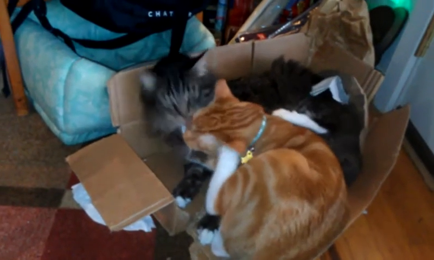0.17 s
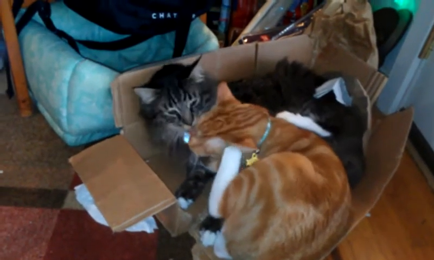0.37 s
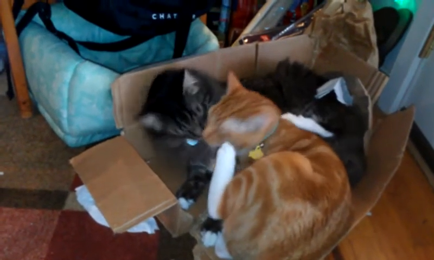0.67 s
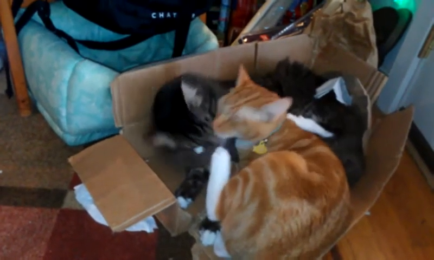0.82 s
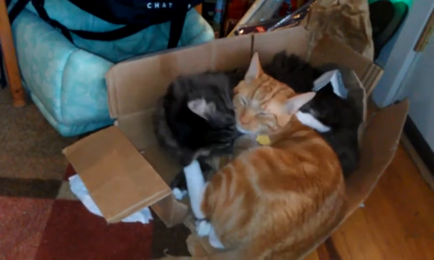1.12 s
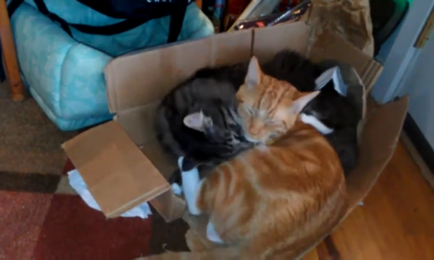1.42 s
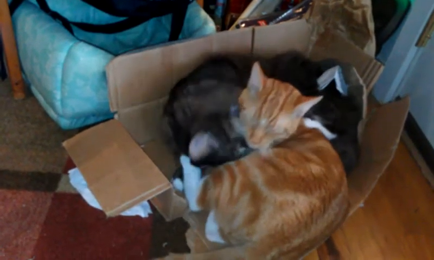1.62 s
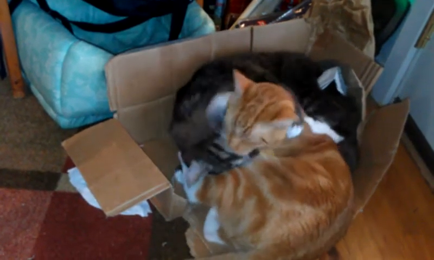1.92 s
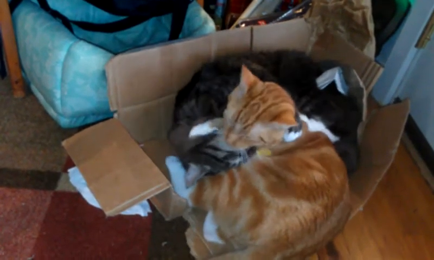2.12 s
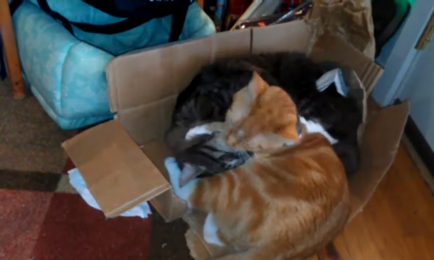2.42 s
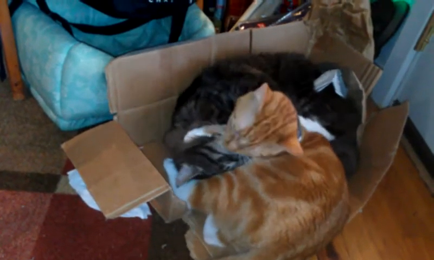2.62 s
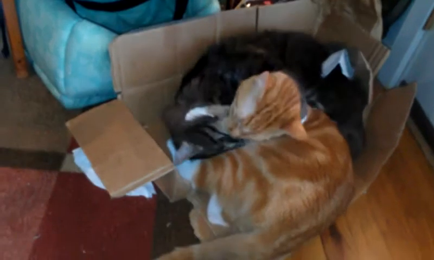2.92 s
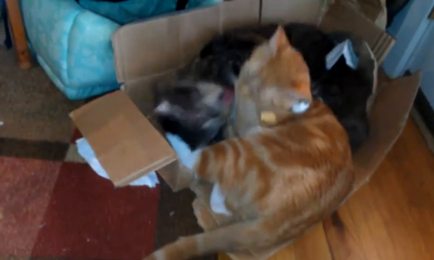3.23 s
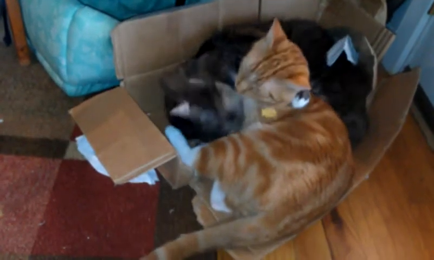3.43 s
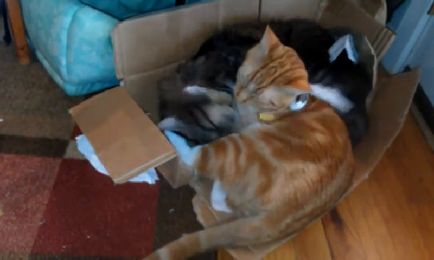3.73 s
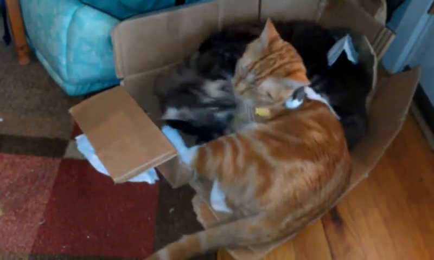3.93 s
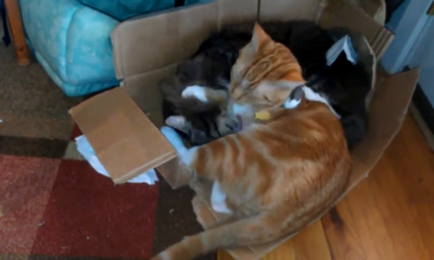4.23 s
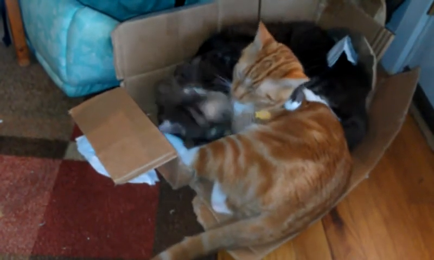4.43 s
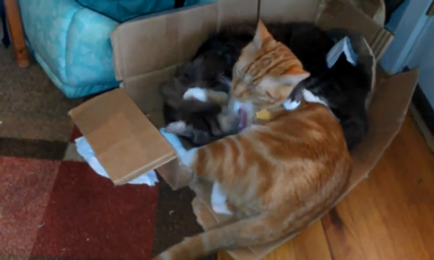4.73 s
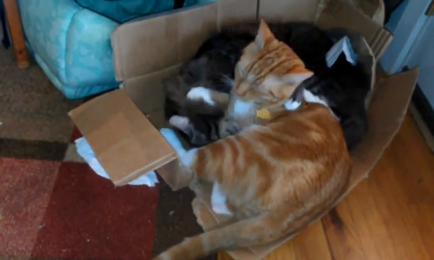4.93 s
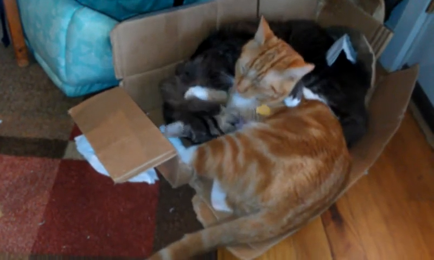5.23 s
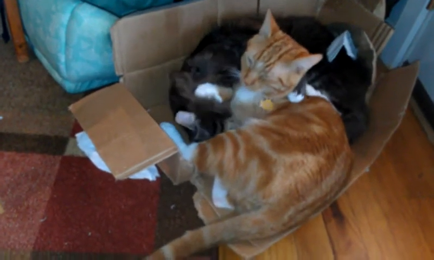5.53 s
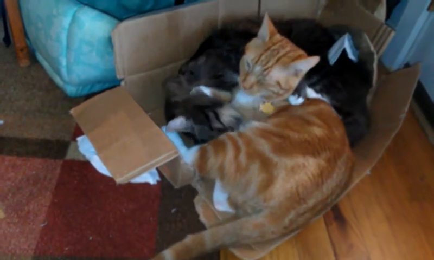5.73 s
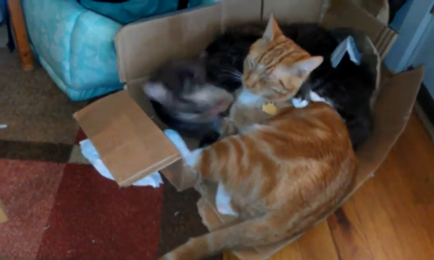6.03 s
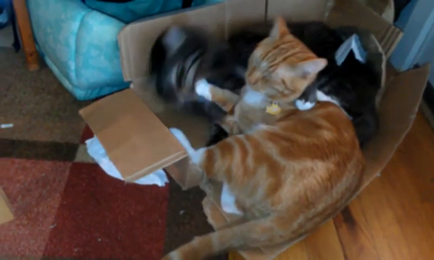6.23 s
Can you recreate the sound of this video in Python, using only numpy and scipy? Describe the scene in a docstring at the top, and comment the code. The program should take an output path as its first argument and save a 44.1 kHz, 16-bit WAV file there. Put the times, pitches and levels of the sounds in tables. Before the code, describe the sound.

Cats groom each other in a cardboard box in a quiet room. A tongue smacks, then fur drags and snags on the cardboard in short, scratchy scuffs, with a faint collar tag tinkle and a brief crisp rustle. Sparse licks and mouth clicks follow before a last bout of scuffing. An appliance hums steadily underneath, and the small, close microphone makes everything sound thin.

```python
"""Two cats groom each other in a cardboard box in a quiet room; an appliance hums throughout.
A tongue smacks, then fur drags and snags on the cardboard as they shift. Near 2 s a collar tag tinkles,
and near 2.8 s comes a crisp rustle, close by. Sparse mouth clicks, tongue smacks and light strokes
follow, until a last bout of scuffing at 6 s. The small microphone rings near 3 kHz, which gives
the scuffs and clicks the same thin colour."""
import sys
import numpy as np
from scipy import signal
from scipy.fft import rfft, irfft
from scipy.io import wavfile

SR = 44100
rng = np.random.default_rng(int(sys.argv[2]) if len(sys.argv) > 2 else 0)


def master_out(mix):
    """Clip the mix to full scale and print it as 16-bit PCM to the path in sys.argv[1]."""
    frames = np.transpose(np.atleast_2d(mix))
    ceiling = np.clip(frames, -1, 1)
    pcm = np.round(ceiling * 32767).astype(np.int16)
    wavfile.write(sys.argv[1], SR, pcm)


N = 280476
TIME = np.arange(N) / SR

# friction as the small microphone colours it: frequency_hz, relative_db
MIC_COLOUR = [(100, -59), (300, -30), (750, -23.5), (1250, -26), (1700, -17), (2200, -12), (2650, -2.5),
              (3080, 3), (3600, -6.5), (4400, -22), (5400, -31), (8300, -54), (11000, -66), (14500, -34)]
# the hardest snags of fur on the cardboard: start_s, level_db
FUR_SNAGS = [(1.209, -22.5), (1.28, -18), (1.2997, -16), (1.38, -16.5), (1.4798, -11), (1.515, -10),
             (1.7795, -13), (1.8354, -16), (2.048, -11), (6.1759, -13), (6.2943, -13.5), (6.325, -8)]


def amp(db):
    """Decibels to gain."""
    return 10 ** (np.asarray(db) / 20)


def unit_rms(x):
    """Scales to rms 1."""
    return x / np.sqrt(np.mean(x ** 2) + 1e-20)


def unit_peak(x):
    """Scales to peak 1."""
    return x / abs(x).max()


def add(mix, start_s, sound):
    """Mixes a sound in at start_s."""
    part = mix[max(round(start_s * SR), 0):][:len(sound)]
    part += sound[:len(part)]


def colour(x, spectrum, size=4096):
    """Minimum-phase filter of energy 1, shaped like the given spectrum."""
    hz, db = np.transpose(spectrum)
    bins_hz = abs(np.fft.fftfreq(size, 1 / SR))
    log_gain = np.log(amp(np.interp(np.log(bins_hz + 1), np.log(hz), db)))
    response = np.exp(np.conj(signal.hilbert(log_gain)))
    taps = np.fft.ifft(response).real[:size // 2]
    return signal.oaconvolve(x, taps / np.linalg.norm(taps))[:len(x)]


def drift(rate_hz):
    """Smooth random motion of rms 1, mostly slower than rate_hz."""
    lowpass = np.exp(-(np.fft.rfftfreq(N, 1 / SR) / rate_hz) ** 2)
    return unit_rms(irfft(rfft(rng.standard_normal(N)) * lowpass, N))


def ring(hz, decay_s):
    """A damped sine, a tenth of a second long."""
    t = np.arange(SR // 10) / SR
    return np.exp(-t / decay_s) * np.sin(2 * np.pi * hz * t)


def room_tone(level_db=-46, swell_db=0.37):
    """The air of the quiet room and the microphone's own hiss, almost steady."""
    # air and hiss: frequency_hz, relative_db
    spectrum = [(65, -39.5), (175, -20.5), (235, -4), (275, -7), (370, -5), (750, -10.5), (1500, -12.5),
                (2200, -8.5), (3100, 1), (4200, -19.5), (6500, -22), (8000, -29.5), (9500, -23),
                (15000, -20)]
    air = unit_rms(colour(rng.standard_normal(N), spectrum))
    return air * amp(level_db + swell_db * drift(3.5))


def appliance_hum(waver_db=1.2, wander_hz=0.54):
    """An appliance hums in the room; each partial wavers a little in level and pitch."""
    # partials of the hum: pitch_hz, rms_db
    partials = [(119, -82.5), (315.8, -53), (947, -67.5), (1263, -74.5)]
    out = np.zeros(N)
    for hz, db in partials:
        level = np.sqrt(2) * amp(db + waver_db * drift(6.4))
        pitch_hz = hz + wander_hz * drift(3.56)
        out += level * np.sin(2 * np.pi * np.cumsum(pitch_hz) / SR)
    return out


def echoes(x, wall_db=-14, wall_s=0.0032, far_db=-17, far_s=0.014, tail_db=-10, t60_s=0.12):
    """The box wall and a farther surface reflect once; the furnished room adds a short tail."""
    t = np.arange(SR // 3) / SR
    tail = rng.standard_normal(len(t)) * amp(-60 * t / t60_s) * (t > wall_s)
    taps = amp(tail_db) * tail / np.linalg.norm(tail)
    add(taps, wall_s, amp([wall_db]))
    add(taps, far_s, amp([far_db]))
    return signal.oaconvolve(x, taps)[:N]


def box_bumps(low_cut_hz=170):
    """Padded knocks: the cardboard swells into a few cycles and stops."""
    # knocks against the box: start_s, level_db, pitch_hz, decay_s
    knocks = [(1.326, -36.5, 796, 0.0018), (1.956, -40.5, 780, .002), (2.061, -32.5, 500, 0.0016),
              (2.072, -36, 806, 0.0026), (2.768, -34.5, 326, 0.00073)]
    out, t = np.zeros(N), np.arange(SR // 10) / SR
    for start_s, db, hz, decay_s in knocks:
        swell = np.e * t / decay_s
        add(out, start_s, amp(db) * swell * ring(hz, decay_s))
    return signal.sosfilt(signal.butter(3, low_cut_hz, "highpass", fs=SR, output="sos"), out)


def collar_tag():
    """Each tap sets the metal tag's high modes tinkling faintly."""
    # taps on the tag: start_s, level_db
    taps = [(1.875, -34.5), (1.893, -43), (1.908, -52), (1.931, -45), (6.205, -44)]
    # modes of the metal: pitch_hz, relative_db, t60_s
    modes = [(6030, -13, .03), (6900, -9, 0.045), (10470, 0.5, 0.021), (14200, -7, .02)]
    tinkle = sum(amp(db) * ring(hz, t60_s / np.log(1000)) for hz, db, t60_s in modes)
    out = np.zeros(N)
    for start_s, db in taps:
        add(out, start_s, amp(db) * tinkle)
    return out


def close_rustles():
    """Bright crackles close to the microphone swell and die in milliseconds."""
    # rustles and ticks: start_s, level_db, rise_s, decay_s
    bursts = [(1.871, -42.5, 0.026, .025), (1.93, -46, 0.00085, .012), (1.946, -41.5, .001, 0.0083),
              (2.706, -40, .001, .002), (2.7492, -33.5, 0.00029, 0.00074), (2.783, -37, .001, 0.005),
              (2.801, -27, 0.0044, 0.0091), (2.8104, -27.5, 0.00091, 0.004)]
    # their crisp colour: frequency_hz, relative_db
    spectrum = [(200, -30), (1800, -15), (3200, 8), (4500, -10.5), (6000, 0), (8500, -13.5), (11000, -13),
                (14000, -3.5), (16000, -17)]
    out, t = np.zeros(N), np.arange(SR // 10) / SR
    for start_s, db, rise_s, decay_s in bursts:
        envelope = np.minimum(t / rise_s, 1) * np.exp(-np.maximum(t - rise_s, 0) / decay_s)
        add(out, start_s, amp(db) * envelope * rng.standard_normal(len(t)))
    return colour(out, spectrum)


def mouth_ticks(ticks_per_s=5, tick_db=-35, spread_db=2, mouth_hz=3000, decay_s=0.00047):
    """The wet mouths tick faintly at random."""
    tick = unit_peak(colour(ring(mouth_hz, decay_s), MIC_COLOUR))
    sizes = amp(tick_db + spread_db * rng.uniform(-1, 1, N))
    onsets = rng.random(N) < ticks_per_s / SR
    return signal.oaconvolve(sizes * onsets, tick)[:N]


def tongue_noises():
    """Short narrow-band noises: tongue rasps, squeaks, and the bright snap of three tongue smacks."""
    # rasps, squeaks and snaps of smacks: start_s, level_db, length_s, centre_hz, width_hz
    bursts = [(0.193, -37, 0.0047, 4250, 550), (0.427, -46.5, 0.16, 4300, 450),
              (0.49, -37, 0.051, 3640, 70), (1.422, -38, 0.02, 4500, 800), (1.978, -37, 0.055, 4460, 815),
              (2.558, -33, .014, 2660, 400), (3.103, -35, 0.0067, 3690, 250),
              (4.551, -37.5, 0.0076, 4530, 450)]
    out = np.zeros(N)
    for start_s, db, length_s, hz, width_hz in bursts:
        band = signal.butter(2, [hz - width_hz / 2, hz + width_hz / 2], "bandpass", fs=SR, output="sos")
        noise = unit_rms(signal.sosfilt(band, rng.standard_normal(SR // 4)))
        burst = noise[-round(length_s * SR):]
        add(out, start_s, amp(db) * burst * np.hanning(len(burst)))
    return out


def tongue_smacks(gain_db=-1, mouth_decay_s=0.00031, pop_db=-9, pop_hz=2150):
    """The tongue lets go: the mouth rings for a few cycles over a short, lower pop."""
    # clear smacks: start_s, level_db, mouth_hz
    smacks = [(0.195, -20, 3230), (1.076, -22.5, 2730), (1.1193, -27, 3000), (1.433, -15, 3600),
              (1.449, -18, 3100), (2.4605, -18.5, 3370), (3.106, -23, 3130), (3.169, -22, 3400),
              (3.4115, -25.5, 2710), (3.5094, -22.5, 3130), (3.52, -22.5, 2980), (3.899, -18, 3020),
              (4.219, -22, 2940), (4.5511, -23, 2560), (4.5542, -20.5, 2880), (4.8424, -22, 2600),
              (5.4095, -18.5, 2980), (5.843, -25.5, 2860)]
    pop = amp(pop_db) * unit_peak(colour(ring(pop_hz, decay_s=0.0004), MIC_COLOUR))
    out = np.zeros(N)
    for start_s, db, mouth_hz in smacks:
        mouth = unit_peak(colour(ring(mouth_hz, mouth_decay_s), MIC_COLOUR))
        add(out, start_s, amp(db + gain_db) * unit_peak(mouth + pop))
    return out


def fur_snags(gain_db=-1.5, click_hz=2950, decay_s=0.00065):
    """A tuft catches on the cardboard and slips free in one sharp click."""
    click = unit_peak(colour(ring(click_hz, decay_s), MIC_COLOUR))
    out = np.zeros(N)
    for start_s, db in FUR_SNAGS:
        add(out, start_s, amp(db + gain_db) * click)
    return out


def sticking(hush_db=-7, hold_s=0.0027):
    """Gain that dips as a caught tuft stalls the sliding, just before it slips free."""
    caught = sum(np.exp(-abs(slip_s - TIME) / hold_s) * (TIME < slip_s) for slip_s, _ in FUR_SNAGS)
    return amp(hush_db * caught)


def pressure(start_s, length_s, db, crest_share, touch_s=0.014, lift_s=0.03, ends_db=-8.5, arch=1.42):
    """Envelope of one stroke: it touches down, presses up to its crest, eases off and lifts away."""
    crest_s, end_s = start_s + crest_share * length_s, start_s + length_s
    off_crest = np.interp(TIME, [start_s, crest_s, end_s], [1, 0, 1])
    fade = np.maximum(start_s - TIME, 0) / touch_s + np.maximum(TIME - end_s, 0) / lift_s
    return amp(db + ends_db * off_crest ** arch) * np.exp(-fade)


def fur_strokes(gain_db=0.37, catches_per_s=520, spread_db=1.5, catch_share=0.45, judder_db=1.17):
    """Hairs slide as a smooth hiss and catch in tiny slips; the pressure judders along the stroke."""
    # strokes of fur or tongue: start_s, length_s, level_db, crest_share (0-1 of the length)
    strokes = [(0.428, 0.15, -26.5, 0.31), (0.717, 0.11, -43, 0.8), (1.107, 0.04, -36, 0.86),
               (1.213, 0.14, -29.5, 0.8), (1.36, 0.083, -28.5, 0.97), (1.46, 0.11, -23.5, 0.75),
               (1.606, 0.14, -28.5, 0.63), (1.741, 0.053, -28, 0.43), (1.846, 0.14, -25, 0.5),
               (1.982, 0.038, -22.5, 0.64), (2.051, 0.036, -16.5, 0.32), (2.094, 0.13, -41, 0.05),
               (2.694, 0.016, -38.5, 0.65), (2.97, 0.11, -43, 0.33), (3.103, 0.07, -33.5, 0.77),
               (3.845, 0.12, -37, 0.7), (4.06, 0.11, -43, 0.9), (4.205, 0.028, -40, 0.6),
               (6.095, 0.065, -32.5, 0.86), (6.17, 0.14, -23, 0.4), (6.334, 0.035, -24.5, 0.5)]
    envelope = np.sqrt(sum(pressure(*stroke) ** 2 for stroke in strokes))
    sizes = amp(spread_db * np.minimum(rng.exponential(1, N), 3)) * rng.choice([-1, 1], N)
    catches = unit_rms(sizes * (rng.random(N) < catches_per_s / SR))
    sliding = np.sqrt(catch_share) * catches + np.sqrt(1 - catch_share) * rng.standard_normal(N)
    juddering = unit_rms(sliding * amp(judder_db * drift(100)))
    return amp(gain_db) * colour(envelope * sticking() * juddering, MIC_COLOUR)


def scene(friction_send_db=-4):
    """The box on one microphone; friction under the cats reaches the room less than the clicks do."""
    friction = fur_strokes()
    mouths = tongue_smacks() + mouth_ticks() + tongue_noises()
    clicks = mouths + fur_snags() + close_rustles() + box_bumps() + collar_tag()
    background = room_tone() + appliance_hum()
    reflections = echoes(clicks + amp(friction_send_db) * friction)
    return (background + friction + clicks + reflections)[None]


def record(dry, edge_hz=15950):
    """The recorder cuts the treble steeply above edge_hz."""
    taps = signal.firwin(1023, edge_hz, window=("kaiser", 9), fs=SR)
    return signal.oaconvolve(dry, taps[None], "same")


dry = scene()
out = record(dry)
master_out(out)
```